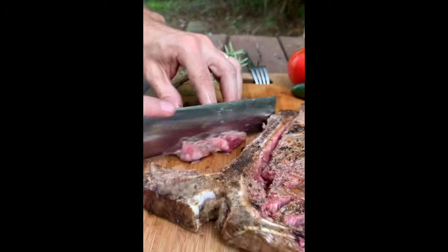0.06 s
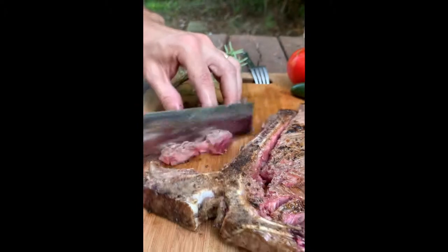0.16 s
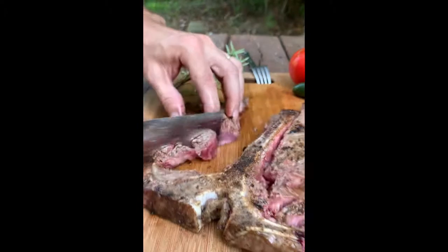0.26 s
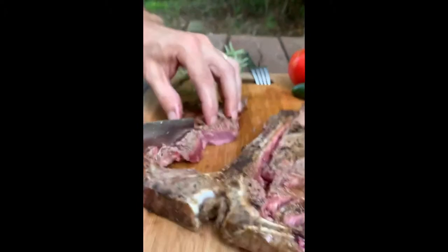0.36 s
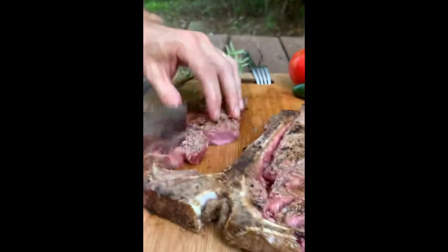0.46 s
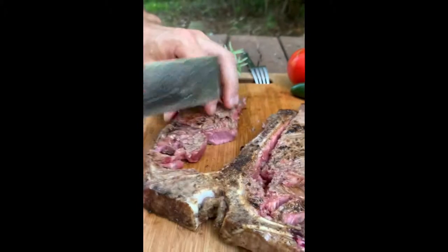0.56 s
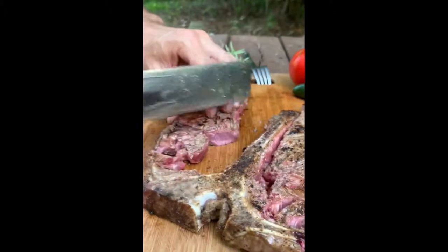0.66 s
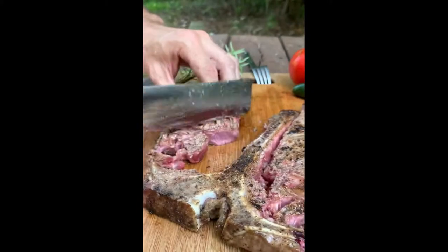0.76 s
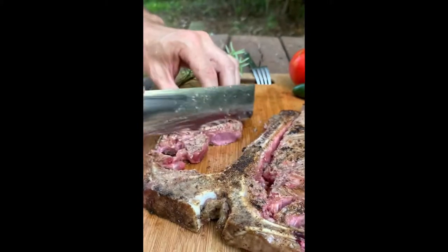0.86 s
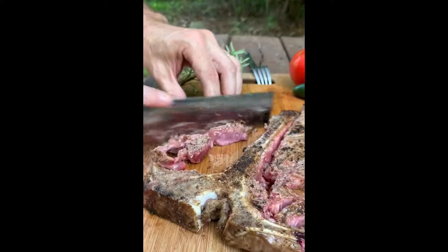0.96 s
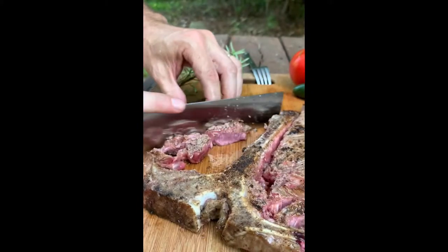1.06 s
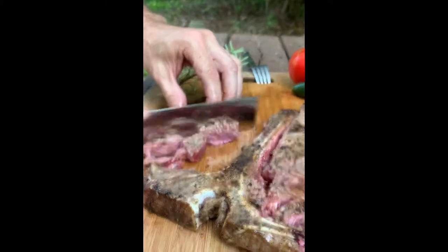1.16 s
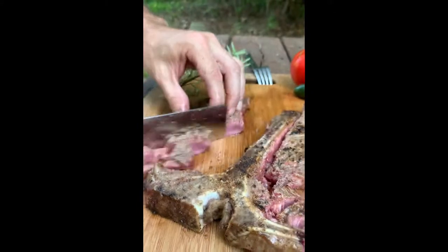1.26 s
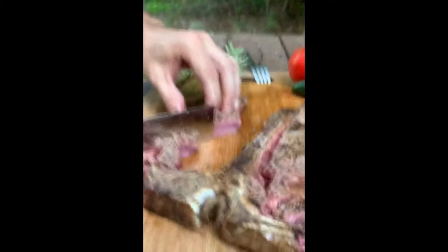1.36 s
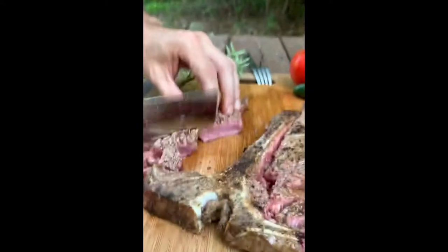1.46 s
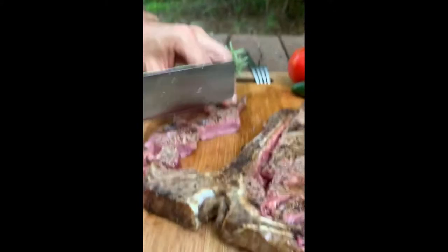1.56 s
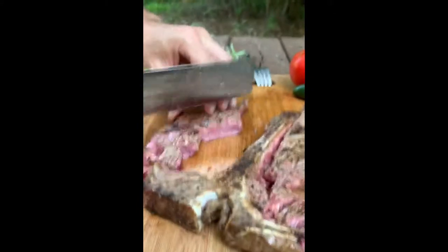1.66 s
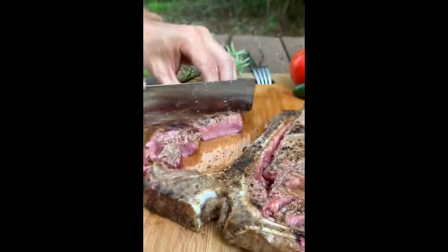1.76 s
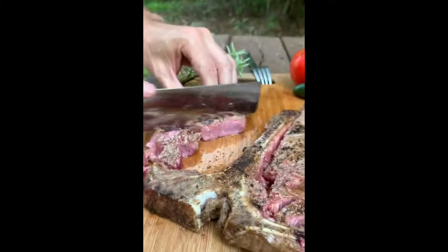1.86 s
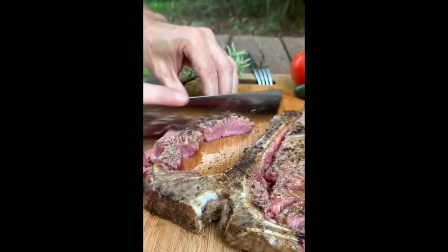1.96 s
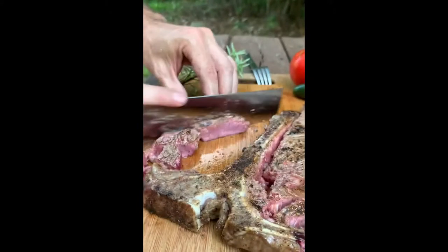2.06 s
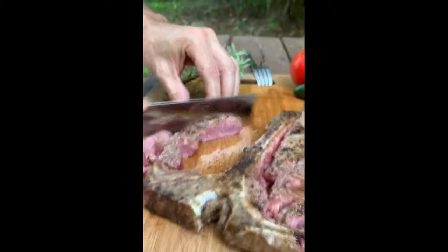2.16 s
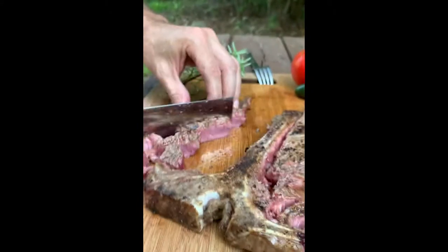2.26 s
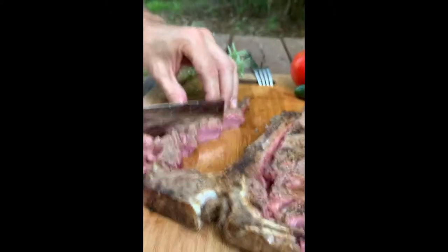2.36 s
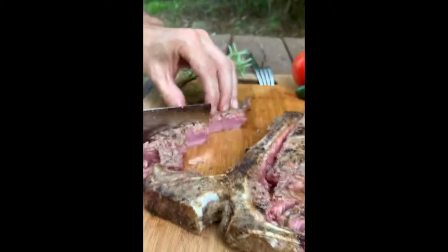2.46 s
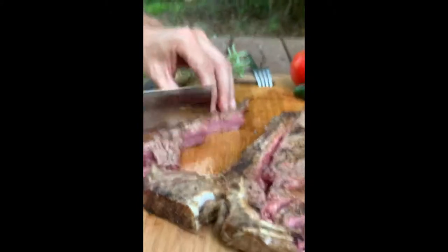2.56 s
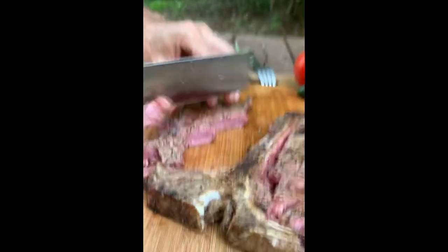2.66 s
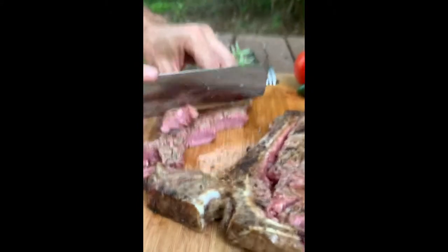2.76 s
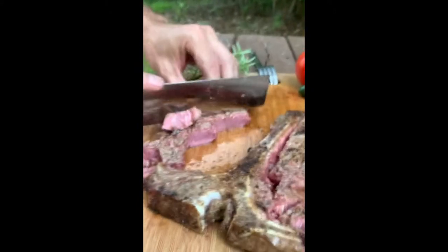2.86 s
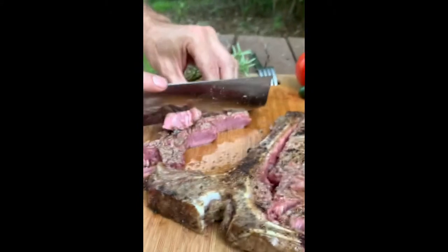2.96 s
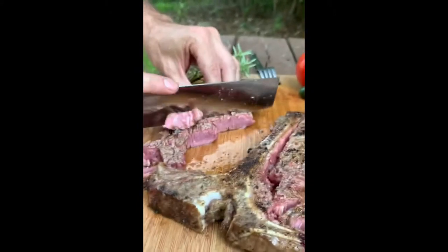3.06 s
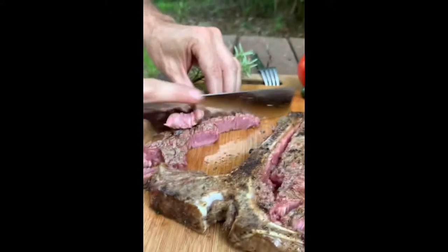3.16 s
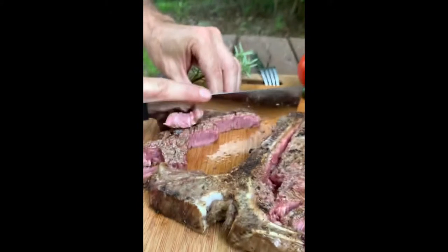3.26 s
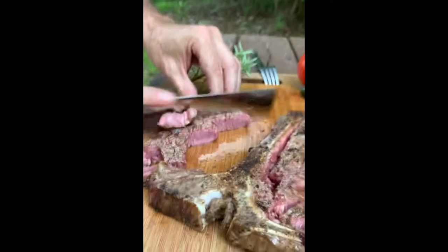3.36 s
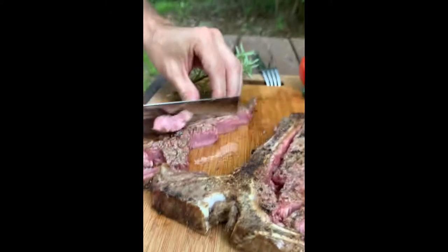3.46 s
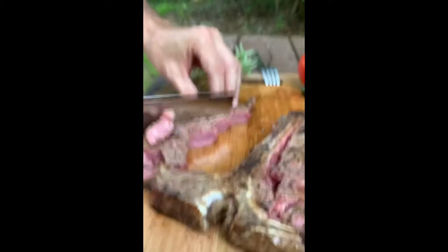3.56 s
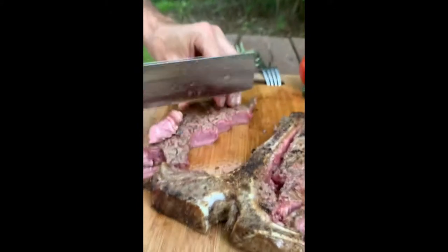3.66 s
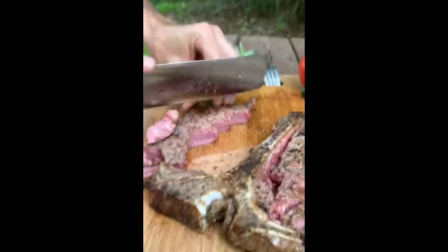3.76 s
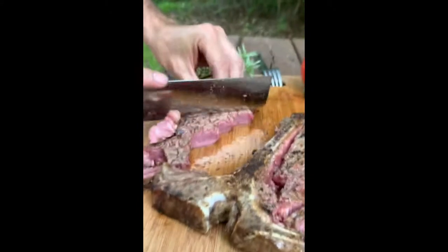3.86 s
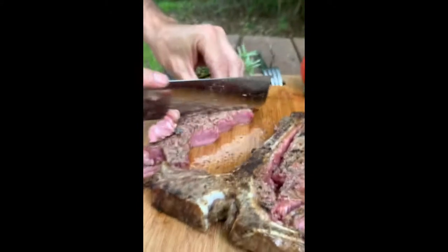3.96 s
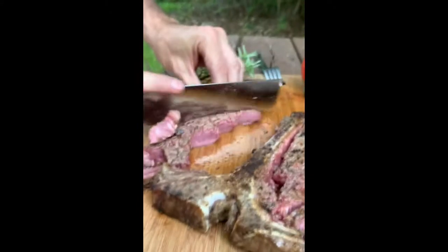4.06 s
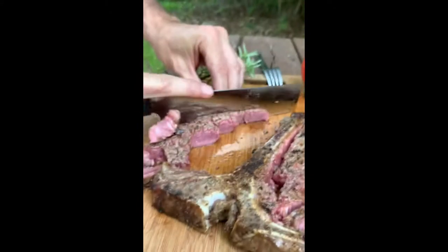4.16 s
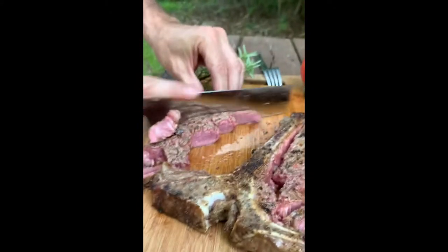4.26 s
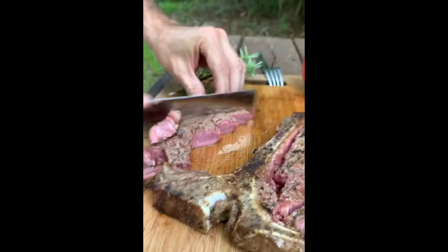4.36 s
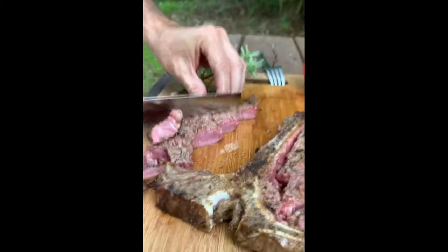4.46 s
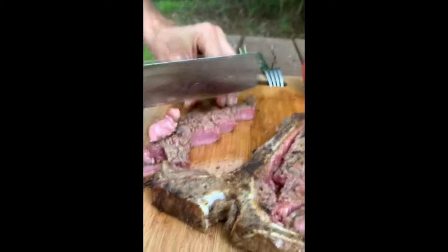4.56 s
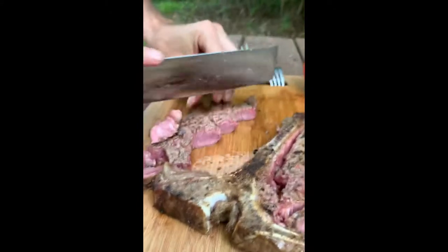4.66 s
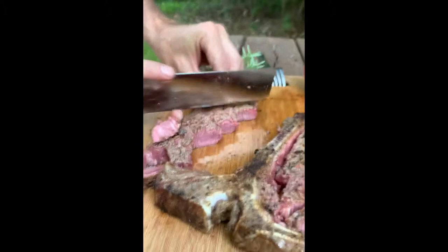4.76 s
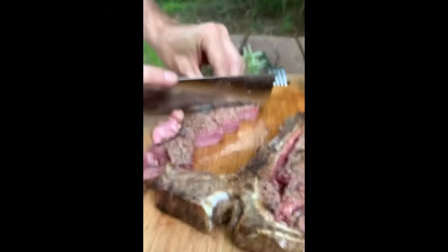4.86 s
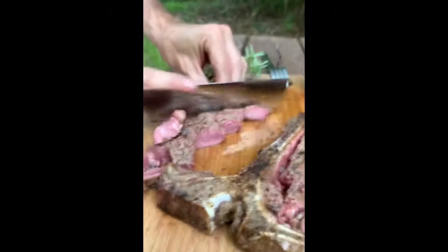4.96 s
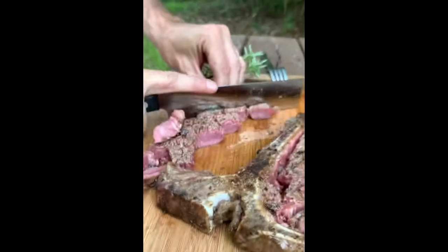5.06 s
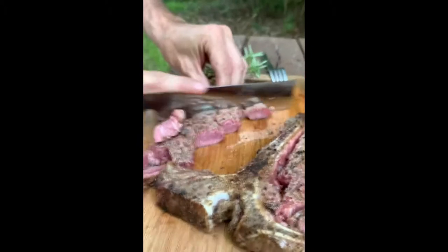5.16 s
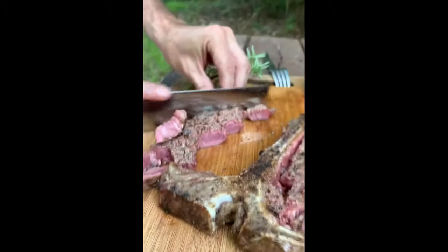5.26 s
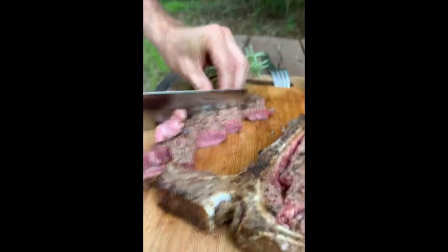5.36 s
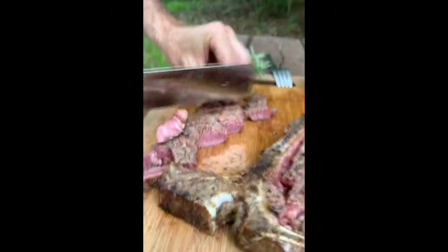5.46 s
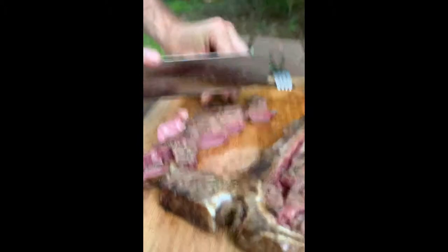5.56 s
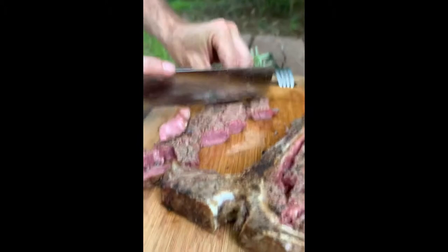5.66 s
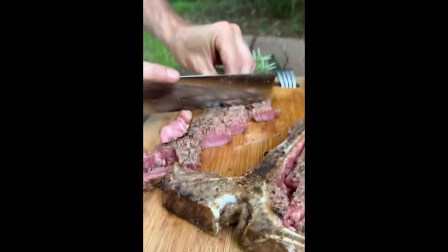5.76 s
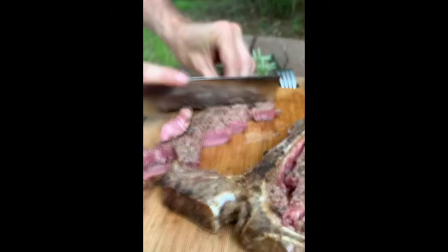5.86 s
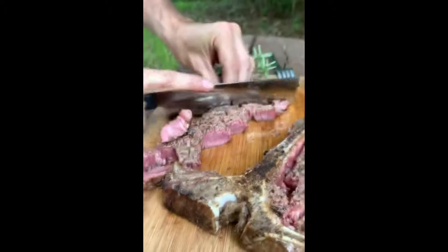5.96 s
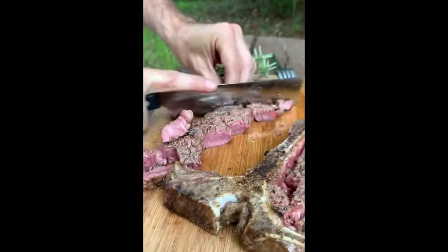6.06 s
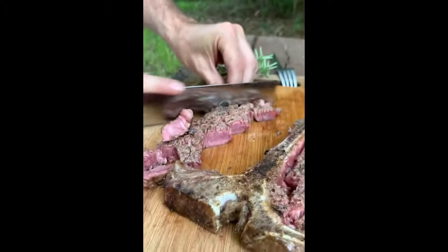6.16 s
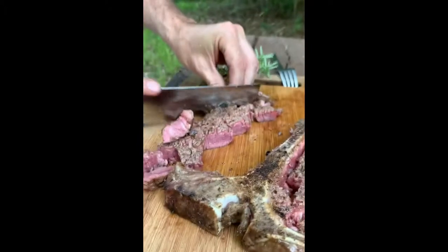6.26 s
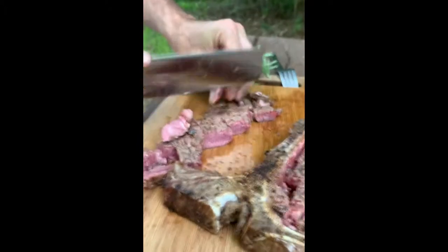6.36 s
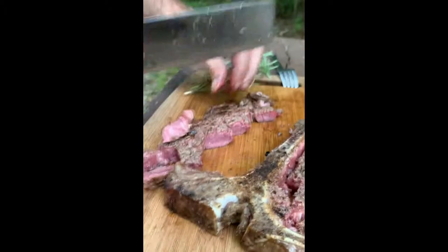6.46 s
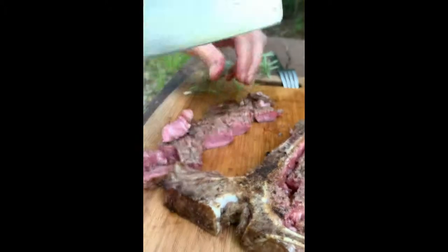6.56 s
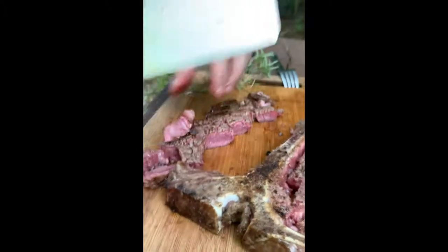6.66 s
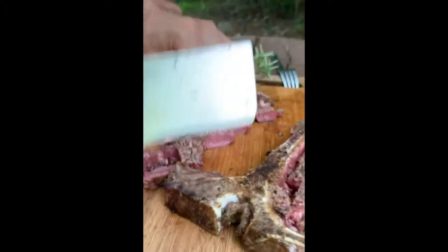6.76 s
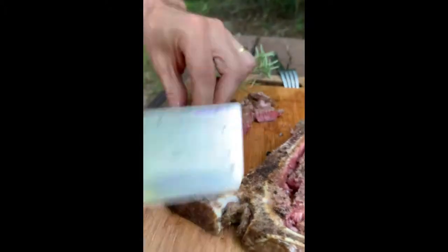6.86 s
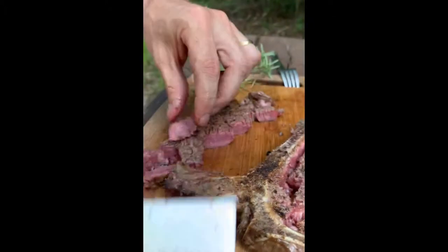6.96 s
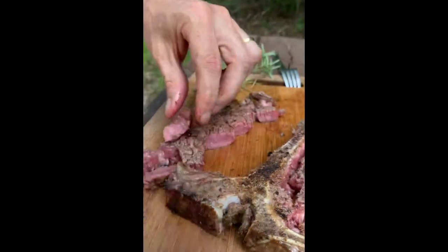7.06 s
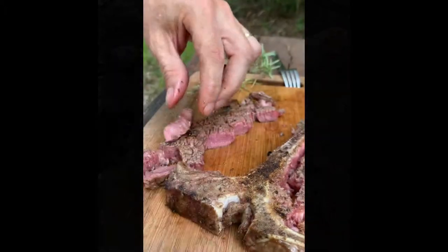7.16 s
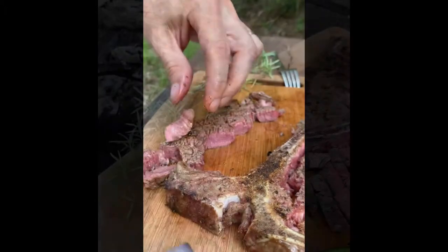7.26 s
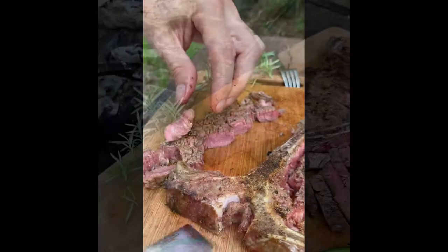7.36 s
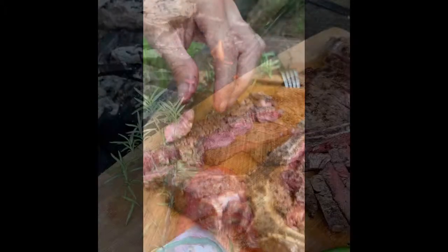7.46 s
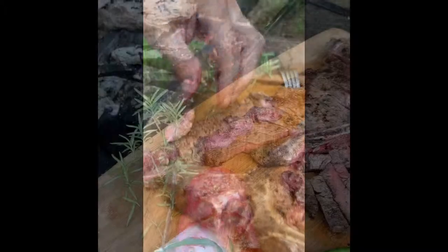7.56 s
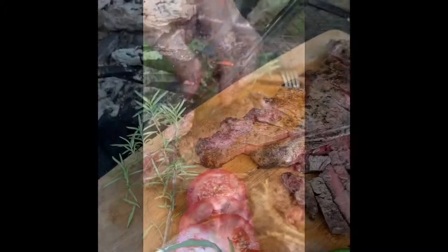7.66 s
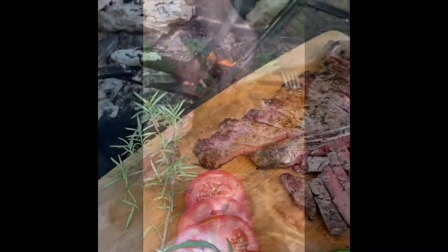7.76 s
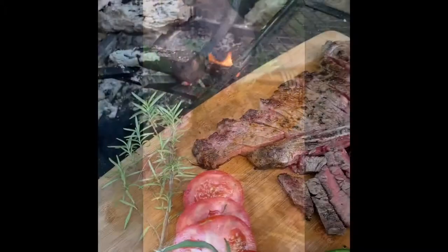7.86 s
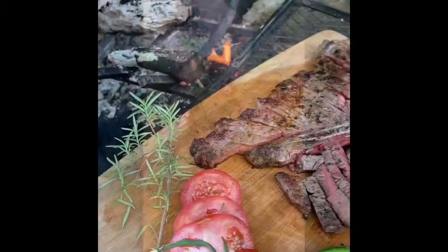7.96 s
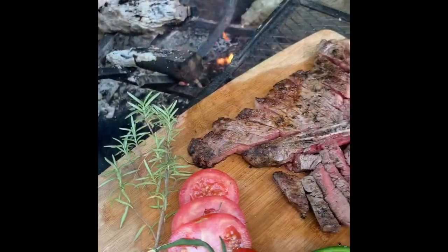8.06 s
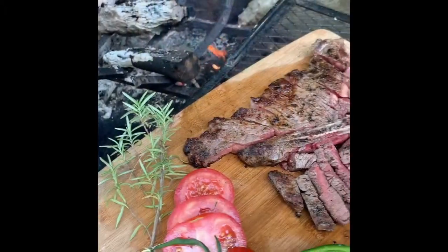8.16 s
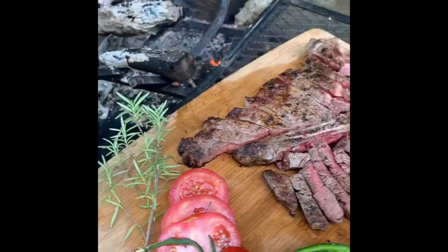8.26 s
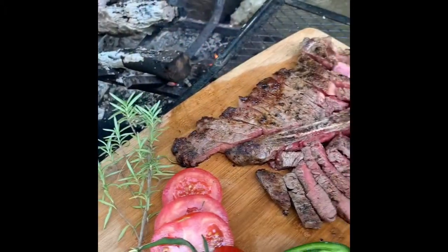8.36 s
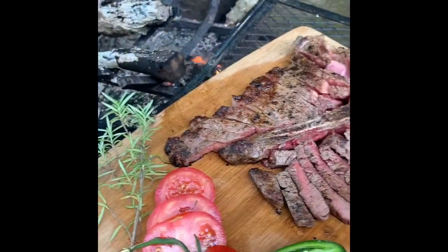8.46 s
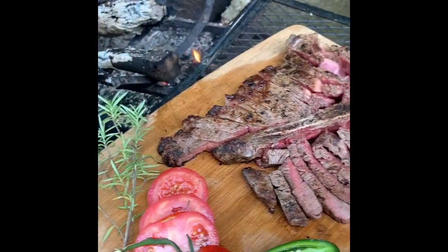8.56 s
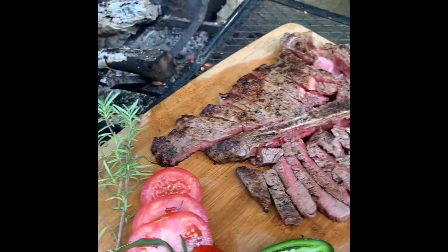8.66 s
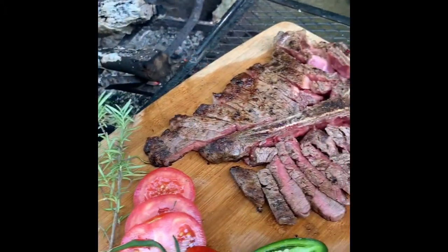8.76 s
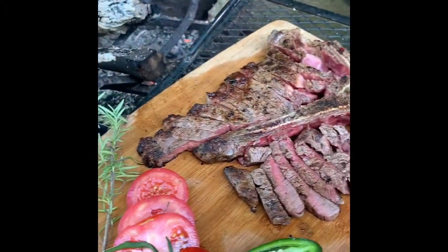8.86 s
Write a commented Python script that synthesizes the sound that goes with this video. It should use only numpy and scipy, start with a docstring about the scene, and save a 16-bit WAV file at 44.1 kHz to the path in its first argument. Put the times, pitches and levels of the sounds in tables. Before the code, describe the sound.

Close up outdoors, a knife slices cooked steak on a wooden board, seven knocks with gritty scrapes, then clinks down on the table as garden hiss fades.

```python
"""A knife knocks on a wooden board close to the microphone in a garden: cooked steak is being sliced.
Each cut is a shear of noise ending in a board knock; the edge is then drawn back in a scrape of resonant
friction that catches in the grain. Meat bumps and ticks, and a breeze of low noise rumbles on the microphone.
The blade is put down with ringing clinks and a table thud; the hiss of the garden fades, leaving faint air
and the gliding whistles of a far bird."""
import sys
import numpy as np
from scipy import signal
from scipy.fft import rfft, irfft
from scipy.io import wavfile
from scipy.ndimage import map_coordinates

SR = 44100
rng = np.random.default_rng(int(sys.argv[2]) if len(sys.argv) > 2 else 0)


def store_wav(level_fs):
    """Save 16-bit WAV to argv[1]."""
    pcm = np.round(np.clip(np.atleast_2d(level_fs), -1, 1) * 32767)
    wavfile.write(sys.argv[1], SR, pcm.T.astype(np.int16))


N = 392931
T, HZ = np.arange(N) / SR, np.fft.rfftfreq(N, 1 / SR)
AGE = np.arange(SR // 2) / SR  # seconds since a blow

# Resonances of the blade under friction. Each row: centre in Hz, width in Hz, weight in dB.
BLADE_BANDS = [(1745, 120, 2.5), (2024, 460, -1), (2300, 220, -0.5), (2900, 300, -18)]
# Resonances of the board under friction. Each row: centre in Hz, width in Hz, weight in dB.
BOARD_BANDS = [(910, 15, -2), (993, 63, 2.5), (1063, 54, 2.5)]
# Colour of shearing meat and of the edge snapping free. Each row: pitch in Hz, relative density in dB.
MEAT_SPECTRUM = [(100, -13.5), (350, 24), (700, -11), (1050, 11.5), (1450, 6.5), (2000, 12), (3000, 6),
                 (5000, 11.5), (9000, 4.5), (13000, 9), (16000, 1.5)]
# Colour of a dull bump on wood. Each row: pitch in Hz, relative density in dB.
BUMP_SPECTRUM = [(80, -8), (300, -4), (550, 0), (700, -6), (1000, -26), (1500, -40), (3000, -60)]
# Colour of steel ticking on wood. Each row: pitch in Hz, relative density in dB.
CLINK_SPECTRUM = [(60, -13), (200, 15), (700, 1.5), (2000, -1), (4500, 9), (6500, -10), (9000, -6.5),
                  (16000, -18)]
# Short modes of the handle. Each row: pitch in Hz, weight in dB, t60 in seconds.
HANDLE_MODES = [(620, -3, .025), (985, -2, .03), (1210, -7, .025), (1300, 4.5, .04), (1775, -4, .03),
                (2010, -7, .03), (2430, -6, .04), (2560, -7, .035), (3000, -8, .03), (3670, -14, .03),
                (4340, -13, .025)]
# Swell and fade of garden and insects. Each row: time in seconds, level change in dB.
GARDEN_FADE = [(0, 3.5), (3, 4.5), (7.2, 3), (7.6, 1.5), (7.9, -9), (8.2, -20), (8.9, -51)]
# Cuts down through the meat. Each row: second when the edge lands, knock level in dB, sharpness of
# the blow in dB, shear level in dB, how long before landing the shear is full in seconds,
# crunch of the last fibres in dB, boost of the knock's low notes in dB.
CUTS = [(0.015, -19.5, 3, -44.5, .02, -68, 7), (1.018, -11, 3, -41, 0.004, -57.5, 1.5),
        (2.002, -19, 4, -45, 0.031, -48.5, 1.5), (3.213, -7.5, 7, -44.5, 0.025, -47, -5.5),
        (4.17, -6.5, 7.5, -40.5, 0.016, -46.5, -6), (5.069, -31, -28, -47, 0.038, -41, 6),
        (5.996, -27.5, -24, -50.5, 0.053, -42.5, -2)]


def amp(db):
    """Decibels to gain."""
    return 10 ** (np.asarray(db) / 20)


def unit(x):
    """Scales to rms 1."""
    return x / np.sqrt(np.mean(x ** 2) + 1e-20)


def peaked(x):
    """Scales to peak 1."""
    return x / abs(x).max()


def read(points, hz):
    """Reads a table along log frequency."""
    f, value = np.transpose(points)
    return np.interp(np.log(hz + 1), np.log(f + 1), value)


def add(mix, s, sound):
    """Mixes a sound in at time s, in seconds."""
    part = mix[max(round(s * SR), 0):][:len(sound)]
    part += sound[:len(part)]


def colour(x, spectrum):
    """Gives x a spectrum, at rms 1."""
    gain = amp(read(spectrum, np.fft.rfftfreq(len(x), 1 / SR)))
    return unit(irfft(rfft(x) * gain, len(x)))


def resonate(x, bands):
    """Passes x through steep resonances, at rms 1."""
    hz = np.fft.rfftfreq(len(x), 1 / SR)
    gain = sum(amp(db) / (1 + (2 * (hz - f) / width) ** 2) for f, width, db in bands)
    return unit(irfft(rfft(x) * gain, len(x)))


def waver(count, rate_hz):
    """Slow chance, rms 1: noise with a soft upper limit near rate_hz."""
    low_pass = np.exp(-(np.fft.rfftfreq(count, 1 / SR) / rate_hz) ** 2)
    return unit(irfft(rfft(rng.standard_normal(count)) * low_pass, count))


def ring(modes, damping=1):
    """Dying modes, peak 1; each blow lands on another spot and weighs them a little differently."""
    total = 0
    for hz, db, t60 in modes:
        decay = amp(db + rng.normal(0, 0.81) - 60 * AGE / (t60 * damping))
        total = total + decay * rng.choice([-1, 1]) * np.sin(2 * np.pi * hz * AGE)
    return peaked(total)


def burst(spectrum, t60, rise=0.0001):
    """Crowded, quickly dying modes as a puff of noise; t60 and rise in seconds."""
    shape = peaked((1 - np.exp(-AGE / rise)) * amp(-60 * AGE / t60))
    return colour(rng.standard_normal(len(AGE)), spectrum) * shape / 2


def rock(pitch=1):
    """The low note of the whole board rocking on the table under a push."""
    rock_hz, t60_s = 139, .11
    onset = 1 - np.exp(-AGE * rock_hz * 2)
    return amp(-60 * AGE / t60_s) * np.sin(2 * np.pi * rock_hz * pitch * AGE) * onset


def crackle(count, per_s=260, spread_db=4.0):
    """Separate snaps of uneven size at random moments, rms 1."""
    size = amp(spread_db * np.minimum(rng.exponential(1, count), 3.5)) * rng.choice([-1, 1], count)
    return unit(size * (rng.random(count) < per_s / SR))


def friction(count, grains_per_s, grain_share, flutter_db):
    """Tiny slips of uneven size over a smooth rub, coming in clumps."""
    slips = (rng.random(count) < grains_per_s / SR) * rng.standard_normal(count)
    rub = grain_share * unit(slips) + rng.standard_normal(count)
    return rub * amp(flutter_db * waver(count, 130))


def stroke(progress, pointedness):
    """Effort of a stroke, 0-1: one arch from rest to rest."""
    return abs(np.sin(np.pi * progress)) ** pointedness


def glide(x, speed):
    """Shifts the pitch of x by a factor that changes over time."""
    return map_coordinates(x, [np.cumsum(speed)], order=3, mode="mirror")


def comb(x, stretch):
    """The contact slides away from the blade's end, so its reflections comb the sound with falling stripes."""
    # Reflections along the blade. Each row: delay in seconds before stretching, signed strength.
    paths = [(.0007, -.3), (.0032, .7), (.0051, -.45)]
    for delay, strength in paths:
        x = x + strength * map_coordinates(x, [np.arange(len(x)) - delay * stretch * SR], order=3)
    return unit(x)


def cuts():
    """The blade shears wet fibres on its way down; the last crunch on the wood and ring blade and board."""
    rise_db_per_s, hold_s, fall_db_per_s = 218.5, 0.011, 426.5
    crunch_delay_s, crunch_width_s, crunch_hiss_db = 0.0085, 0.01656, -5
    out, t = np.zeros(N), np.arange(-SR // 5, SR // 8) / SR  # t is 0 when the edge lands
    for s, _, _, shear_db, sink_s, crunch_db, _ in CUTS:
        rub = friction(len(t), 1200, 0.34, 2.4)
        # the shear swells as the blade sinks in, holds until just after it lands, and dies
        swell_db = rise_db_per_s * np.minimum(t + sink_s, 0) - fall_db_per_s * np.maximum(t - hold_s, 0)
        crunch = amp(crunch_db) * np.exp(-((t - crunch_delay_s) / crunch_width_s) ** 2)
        hiss = (amp(shear_db + swell_db) + amp(crunch_hiss_db) * crunch) * colour(rub, MEAT_SPECTRUM)
        cut = hiss + crunch * resonate(rub, BLADE_BANDS + BOARD_BANDS)
        add(out, s + t[0], cut[s + t >= 0])
    return out


def knocks(spread_s=0.00331, ring_db=-7, chatter_db=-12, rock_db=-22, full_below_hz=720):
    """A blow runs through the board as a bending wave, treble first; wood rings and rocks, the edge chatters."""
    # Colour of the blow. Each row: pitch in Hz, relative density in dB.
    blow_spectrum = [(50, -9.5), (200, -22), (320, 0), (600, 8), (710, 3.5), (790, -1.5), (890, 5.5),
                     (1020, 7.5), (1450, -15.5), (1900, 6.5), (2500, -2.5), (3000, -20), (4300, -15.5),
                     (5500, -39), (8000, -57.5), (16000, -46.5)]
    # Modes of the board. Each row: pitch in Hz, weight in dB, t60 in seconds.
    board_modes = [(298, 5.5, .09), (420, -6, .045), (530, 1, .06), (620, -4, .045), (715, -8, .04),
                   (910, -2, .05), (1020, -3, .05), (1150, -7, .045), (1620, -15, .05), (1885, -2, .05),
                   (2130, -8, .04), (2440, -7, .05)]
    out, hz = np.zeros(N), np.fft.rfftfreq(len(AGE), 1 / SR)
    lead_s = .01  # room ahead of the wave
    # spread_s is the travel time at 1 kHz
    phase = 4 * np.pi * spread_s * np.sqrt(1000 * hz) + 2 * np.pi * hz * lead_s
    wave = peaked(irfft(amp(read(blow_spectrum, hz)) * np.exp(-1j * phase), len(AGE)))
    low_pass = signal.butter(1, full_below_hz, fs=SR, output="sos")
    for s, db, sharp_db, *_, full_db in CUTS:
        knock = amp(sharp_db - 8.0) * wave
        wood = amp(ring_db) * ring(board_modes) + amp(rock_db) * rock()
        chatter = amp(chatter_db) * burst(blow_spectrum, 0.12)
        add(knock, lead_s + 0.002492, wood + chatter)
        low_boost = (amp(full_db) - 1) * signal.sosfilt(low_pass, knock)
        add(out, s - lead_s, amp(db) * (knock + low_boost))
    return out


def scrapes(travel=.9, wet_db=-8, judder_db=-3, judders_per_s=140):
    """The edge rubs and judders along the grain, driving blade and board; meat drags and crackles on steel."""
    # Edge drawn back over the wood. Each row: start in seconds, speeding up in seconds, slowing down in
    # seconds, pointedness of the swell, blade ring in dB, board ring in dB, hiss in dB, extra sheen at
    # the top of the treble in dB, drag of meat in dB, pitch factor of the blade ring, lag of the hiss
    # (above 1 it peaks later than the blade ring), singing of the edge in dB, boost of the board's
    # outer notes in dB.
    strokes = [(0.05, 0.22, 0.2, 1.1, -44, -47, -45, -1.5, -52.5, 1.04, 1.12, -58, 10),
               (1.055, 0.18, 0.17, 1.75, -39.5, -45.5, -39.5, 3.5, -54, 1.04, 1.13, -45.5, 3),
               (2.045, 0.11, 0.25, 1.43, -42, -47.5, -45.5, -1, -55, 1.03, 0.97, -53, 0),
               (2.32, 0.15, 0.14, 2.8, -47, -56.5, -48.5, -8, -61.5, 1.01, 0.91, -61, 2),
               (3.275, 0.15, 0.16, 2.57, -34, -39.5, -37, -4, -52.5, 1.013, 1.09, -36, -8),
               (4.22, 0.13, 0.17, 1.9, -36, -39.5, -38.5, 1, -53, 1.015, 1.16, -42, -4),
               (5.108, 0.14, 0.24, 2.86, -35, -35, -37, -7.5, -58, 1.046, 1, -36, -11),
               (6.058, 0.14, 0.15, 3.47, -41.5, -35.5, -39, 6.5, -58, 1.04, 0.96, -37, -16)]
    # Colour of the hiss. Each row: pitch in Hz, relative density in dB.
    hiss_spectrum = [(100, -57), (400, 3), (1400, -30), (3000, 6), (3500, 7), (4400, 9), (5700, 8.5),
                     (7500, 3), (9500, 5), (12000, 6), (14300, 2.5), (16000, -1)]
    # Resonances of dragged meat. Each row: centre in Hz, width in Hz, weight in dB.
    drag_bands = [(528, 100, 8), (634, 83, -6), (309.5, 80, 3)]
    # Notes on either side of the board's main ring. Each row: centre in Hz, width in Hz, weight in dB
    # before the stroke's own boost.
    outer_bands = [(1210, 180, -0.5), (766, 156, -13)]
    # how steeply each part follows the stroke, relative to the blade ring
    board_power, hiss_power, drag_power = 1.34, 0.79, 0.38
    # the blade's notes sink as the contact slides along the edge (share of their pitch per s)
    sink_per_s = .18
    # the edge also sings on one narrow resonance that sinks faster
    sing_hz, sing_width_hz, sing_sink_per_s = 1926, 180, .6
    out = np.zeros(N)
    for (s, rise_s, fall_s, pointedness, blade_db, board_db, hiss_db, sheen_db, drag_db, pitch, lag,
         sing_db, outer_db) in strokes:
        t = np.arange(0, rise_s + fall_s, 1 / SR)
        progress = np.interp(t, [0, rise_s, rise_s + fall_s], [0, .5, 1])
        effort = stroke(progress, pointedness)

        rub = friction(len(t), 900, 0.35, 1.2)
        stretch = np.exp(travel * t) * rng.uniform(.85, 1.15)
        grip = amp(1.4 * waver(len(t), 75))
        judder = amp(judder_db) * crackle(len(t), per_s=judders_per_s, spread_db=0.0)
        push = comb((unit(rub) + judder) * grip, stretch)

        # the contact wanders over the grain and feeds each resonance unevenly
        blade_patch, sing_patch, board_patch = (amp(1.2 * waver(len(t), 30)) for _ in range(3))
        blade_speed = pitch * np.exp(-sink_per_s * (t - rise_s))
        blade = amp(blade_db) * blade_patch * effort * glide(resonate(push, BLADE_BANDS), blade_speed)

        sing_speed = np.exp(-sing_sink_per_s * (t - rise_s))
        sing_note = glide(resonate(push, [(sing_hz, sing_width_hz, 0)]), sing_speed)
        sing = amp(sing_db) * sing_patch * effort * sing_note

        board_bands = BOARD_BANDS + [(hz, width, db + outer_db) for hz, width, db in outer_bands]
        board = amp(board_db) * board_patch * effort ** board_power * resonate(push, board_bands)

        drag_level = amp(drag_db + 2 * waver(len(t), 50))
        drag = drag_level * effort ** drag_power * resonate(push, drag_bands)

        bright = [(hz, db + sheen_db * np.clip(hz / 8000 - .8, 0, 1)) for hz, db in hiss_spectrum]
        wet_rub = comb(rub, stretch) + amp(wet_db) * crackle(len(t))
        hiss_effort = stroke(progress ** lag, pointedness * hiss_power)
        hiss = amp(hiss_db) * hiss_effort * colour(wet_rub, bright)
        add(out, s, blade + sing + board + drag + hiss)
    return out


def catches():
    """The edge sticks in the grain and snaps free: a tick and a very short ring."""
    # Snaps of the edge. Each row: start in seconds, level in dB, tick against the ring in dB.
    snaps = [(1.163, -29, -12), (3.362, -29, -10), (3.484, -41, -16), (5.024, -40, 3), (5.071, -34, -2),
             (5.074, -29.5, -5), (5.088, -50, -13), (5.134, -42, -12), (5.241, -29, -6), (5.268, -30, -19),
             (5.941, -41.5, 2), (5.998, -30.5, -1), (6.018, -24, -6), (6.034, -37, 0.5), (6.169, -25, -19),
             (6.193, -22, -20), (6.203, -29, -14), (6.216, -28, -14)]
    # Short ring of the edge. Each row: pitch in Hz, weight in dB, t60 in seconds.
    edge_modes = [(990, -1, .028), (1110, -4, .022), (1860, 1, .022), (2070, -2, .018), (2350, -4, .018),
                  (2850, -10, .012), (3900, -13, .008)]
    out = np.zeros(N)
    for s, db, tick_db in snaps:
        add(out, s, amp(db) * (ring(edge_modes, 1.0) + amp(tick_db) * burst(MEAT_SPECTRUM, 0.03)))
    return out


def handling(rock_db=3, soft_s=0.0014):
    """Hand and meat bump the board with soft onsets, meat ticks as it parts from steel, hollow pops ring."""
    # Soft bumps of hand and meat. Each row: start in seconds, dull knock in dB, rocking of the board
    # in dB before rock_db.
    bumps = [(1.363, -46, -35), (1.422, -48, -41), (1.465, -46.5, -44), (1.488, -52, -57),
             (1.542, -49, -33), (1.607, -55, -33.5), (1.711, -66, -41), (2.288, -48, -58),
             (2.356, -40, -42), (2.443, -47, -32), (2.505, -49, -56), (2.589, -43, -38.5),
             (2.706, -55, -39), (2.825, -40.5, -43), (2.894, -48, -55), (3.096, -70, -37),
             (3.315, -50, -41), (3.507, -59, -56), (3.559, -40.5, -38), (3.627, -44, -54), (3.73, -44, -38),
             (3.808, -41, -39), (3.861, -51, -56), (4.425, -45, -29), (4.558, -36.5, -27),
             (4.651, -44.5, -44), (4.664, -42, -42), (4.759, -42, -52), (4.848, -42, -32), (4.91, -57, -48),
             (5.41, -37, -32.5), (5.6, -49, -44), (5.72, -55, -45)]
    # Modes of the muffled board. Each row: pitch in Hz, weight in dB, t60 in seconds.
    muffled_modes = [(320, -3, .045), (430, -6, .035), (545, -1, .055), (610, 0, .055)]
    # Wet ticks of meat. Each row: start in seconds, relative level in dB, tilt in dB per octave.
    ticks = [(0.533, -43.5, 8), (0.999, -32, 12), (1.782, -38, 2), (1.935, -34, 3), (1.96, -25, 2),
             (2.136, -25, -1), (2.847, -42, 8), (2.901, -37, 0), (3.585, -36, 0), (3.8824, -34, -4),
             (3.986, -42, -7), (4.918, -47, 21), (5.074, -33, -6), (5.7302, -34.5, -9.5), (5.734, -32, 1),
             (5.9434, -29.5, -2), (5.996, -24, -13), (6.8436, -45, 0), (7.186, -36.5, -3),
             (7.5843, -41, 10), (8.0418, -55, 2.5)]
    # Colour of a tick before its tilt. Each row: pitch in Hz, relative density in dB.
    tick_spectrum = [(300, -41), (1500, -5), (4000, 8), (9000, 9), (13000, 10.5), (16000, 3.5)]
    # Small hollow pops. Each row: start in seconds, relative level in dB, pitch in Hz.
    pops = [(1.487, -50, 375), (2.155, -52, 290), (2.357, -46.5, 305), (4.617, -45, 1520), (4.65, -46, 335)]
    out, onset = np.zeros(N), 1 - np.exp(-AGE / soft_s)
    for s, db, push_db in bumps:
        knock = peaked(ring(muffled_modes, 1.0) * onset ** 2)
        knock = knock + amp(-22.5) * burst(BUMP_SPECTRUM, 0.09, rise=0.0073)
        add(out, s, amp(db) * knock + amp(push_db + rock_db) * rock(rng.uniform(.9, 1.123)))
    for s, db, tilt_db in ticks:
        snap = [(hz, level + tilt_db * np.log2(hz)) for hz, level in tick_spectrum]
        add(out, s, amp(db + 1.0) * (burst(snap, 0.01) + 0.14 * burst(snap, 0.14)))
    for s, db, hz in pops:
        tone = resonate(rng.standard_normal(len(AGE)), [(hz, 0.18 * hz, 0)])
        add(out, s, amp(db + 7.0) * tone * amp(-60 * AGE / 0.051) * onset)
    return out


def clinks():
    """Steel touching or leaving wood rings, ticks and slides; once the blade lies flat the wood stills it."""
    # Touches of the blade. Each row: start in seconds, level in dB, ring time as a factor, an unused
    # value, boost of the free tip's modes in dB, tick in dB.
    touches = [(0.455, -41, 0.45, 34, 2, -20), (7.3151, -21, 1.1, -3, -1, 0.5),
               (7.321, -28.5, 0.17, 0, 2, 0), (7.338, -27, 0.15, -3, 0, -3.5),
               (7.401, -42, 0.22, -6, 7, 4.5), (7.424, -42, .2, -3, 5, 5),
               (7.45, -30.5, 0.49, -0.5, -1.5, 0.5), (7.467, -25, 0.83, 4, -11, -2),
               (7.474, -26, 0.5, 0, -13.5, 0), (7.481, -26, 0.4, 17, -10.5, 2.5),
               (7.491, -25, 0.2, 15, -12.5, 4.5), (7.502, -28.5, 0.2, -5, -11.5, -0.5),
               (7.531, -30, 0.6, -5, -11, -2.5)]
    # Modes of the blade. Each row: pitch in Hz, weight in dB, t60 in seconds.
    steel_modes = [(576, -10, .17), (1560, -14, .3), (3525, -15, .2), (4268, -11, .2), (4290, -5, .38),
                   (5450, -13, .08), (6137, -9, .1), (7063, -11, .09), (8083, -5, .2), (8110, -10, .14),
                   (8620, -2, .08), (9300, -6, .1), (10430, -12, .16), (10465, -9.5, .22), (10530, -9, .1),
                   (11650, -12, .1), (12500, -19, .16), (14730, -18, .14), (15620, -21, .2)]
    # The close pair of modes of the free tip, in Hz.
    tip_hz = (4268, 4290)
    # Colour of the sliding blade. Each row: pitch in Hz, relative density in dB.
    slide_spectrum = [(60, 1.5), (170, 13), (800, 1), (1500, 6), (2400, 3), (3200, -8), (4500, -9.5),
                      (6000, -6.5), (9000, -25), (16000, -18)]
    flat_s, still_db_per_s = 7.46, 300
    out = np.zeros(N)
    for s, db, damping, _, tip_db, tick_db in touches:
        modes = [(hz, level + tip_db * (hz in tip_hz), t60) for hz, level, t60 in steel_modes]
        stilled = amp(-still_db_per_s * np.maximum(AGE - max(flat_s - s, 0), 0))
        slide = burst(slide_spectrum, .6 * damping) * amp(3 * waver(len(AGE), 111.1))
        tick = amp(tick_db) * burst(CLINK_SPECTRUM, .024, rise=.0005)
        clink = amp(-1.5) * ring(modes, damping) + tick + amp(-14.5) * slide
        add(out, s, amp(db) * stilled * clink)
    return out


def thuds(rumble_db=-17):
    """The handle drops on the table: table modes ring, the handle clacks and a dull rumble follows."""
    # Blows of the handle. Each row: start in seconds, relative level in dB, hardness of the blow in dB,
    # ring time of the table as a factor, pitch of the handle as a factor.
    drops = [(7.478, -22, -3.5, 0.53, 0.81), (7.483, -28.5, 6.5, 0.95, 0.93),
             (7.491, -25.5, -2.5, 0.58, 0.95), (7.5, -25, 5, 1, 0.91), (7.503, -19.5, 6.5, 1, 0.77),
             (7.5375, -18, 2.5, 0.68, 1), (7.5402, -7, -1, 1, 0.99), (7.5445, -13.5, 8, 1, 1),
             (7.548, -17.5, 5.5, 0.87, 1), (7.68, -22, -15, 1, 1)]
    # Modes of the table. Each row: pitch in Hz, weight in dB, t60 in seconds.
    table_modes = [(226, -9, .1), (285, -9, .08), (340, -7, .12), (377, -1.5, .16), (502, -4.5, .11),
                   (530, -5, .08), (596, 2, .1), (640, -5, .07), (865, -14, .08), (1023, -15, .18),
                   (1295, -2, .09), (1780, -18, .06), (2420, -14, .07)]
    # Colour of the clack. Each row: pitch in Hz, relative density in dB.
    clack_spectrum = [(40, -2.5), (200, 10.5), (450, 2.5), (1250, -11), (1700, -11.5), (2500, -21.5),
                      (4500, -12.5), (7000, -37.5), (16000, -34.5)]
    soft_hz = 430  # a soft blow stirs the table's modes less and less above this pitch
    out = np.zeros(N)
    for s, db, hard_db, damping, pitch in drops:
        softness_db = min(hard_db, 0)
        modes = [(hz, level + softness_db * np.log(max(hz / soft_hz, 1)), t60)
                 for hz, level, t60 in table_modes]
        handle = ring([(hz * pitch, level, t60) for hz, level, t60 in HANDLE_MODES])
        clack = handle + amp(-4) * burst(clack_spectrum, .03, rise=.0006)
        rumble = amp(rumble_db + softness_db / 2) * burst(BUMP_SPECTRUM, 0.14, rise=0.0043)
        add(out, s, amp(db) * (amp(-7.0) * ring(modes, damping) + amp(hard_db - 6.5) * clack + rumble))
    return out


def rattles(taps_per_s=900):
    """Blade and handle chatter as they settle: random taps, each ringing the handle with a tick."""
    # Chatters. Each row: start in seconds, length of the tapping in seconds, peak in dB.
    chatters = [(7.473, 0.052, -24.5), (7.544, 0.022, -22.5)]
    out = np.zeros(N)
    for s, length, db in chatters:
        count = int(length * SR)
        taps = crackle(count, per_s=taps_per_s, spread_db=7.0) * signal.windows.tukey(count, .5)
        tap_sound = ring(HANDLE_MODES) + burst(CLINK_SPECTRUM, 0.015)
        add(out, s, amp(db) * peaked(signal.fftconvolve(taps, tap_sound)))
    return out


def board_width(x, below_hz=1900, side_db=-10.0):
    """The wide board radiates low notes from many points: phase-scrambled, opposite in left and right."""
    low = signal.sosfilt(signal.butter(2, below_hz, fs=SR, output="sos"), x)
    paths = rfft(rng.standard_normal(len(AGE)) * amp(-60 * AGE / .012), N)
    # only the phases of the paths are used, 3 ms late
    side = irfft(rfft(low) * np.exp(1j * np.angle(paths) - 2j * np.pi * HZ * .003), N)
    return amp(side_db) * side * np.array([[1], [-1]])


def surroundings(x, t60=0.28):
    """Faint scatter from table and paving, different in each channel."""
    taps = rng.standard_normal((2, len(AGE))) * amp(-60 * AGE / t60) * (AGE > .002)
    return signal.fftconvolve(x[None], taps / np.linalg.norm(taps[0]), axes=1)[:, :N]


def air(spectrum, patchy_db, diffuse=1):
    """Noise in both channels, gently uneven; the more diffuse, the less alike they are."""
    # Left-right likeness of the open air. Each row: pitch in Hz, likeness from 0 to 1.
    likeness = [(20, 1), (150, 0.71), (400, 0), (1500, 0.2), (2800, 0.5), (4500, 1), (16000, 1)]
    a, b = (colour(rng.standard_normal(N), spectrum) for _ in range(2))
    same = np.clip(read(likeness, HZ), 0, 1) ** diffuse
    right = irfft(same * rfft(a) + np.sqrt(1 - same ** 2) * rfft(b), N)
    return np.array([a, right]) * amp(patchy_db * waver(N, 23))


def breeze():
    """Lumpy turbulence on the microphone, deep and fluttering, with a few single buffets."""
    # Buffets of air. Each row: start in seconds, peak in dB, pitch in Hz, tumbling eddies in dB.
    buffets = [(0.345, -37, 90, -36), (1.35, -18.5, 84, -27), (1.42, -27, 69.5, -27.5),
               (1.544, -43, 121, -54), (1.585, -32.5, 46.7, -54), (1.717, -24.5, 64, -35.5),
               (1.785, -32, 70.5, -39), (1.949, -29, 99, -44), (2.446, -47, 117, -34),
               (3.095, -26, 76, -41), (3.232, -24.5, 65, -31), (3.318, -35, 110, -28.5),
               (3.34, -29, 50, -44), (3.389, -33.5, 110, -33.5), (4.386, -25, 65.5, -46),
               (4.415, -23, 76, -31), (4.645, -26, 68, -31), (4.81, -26, 74.4, -29.5),
               (5.714, -36, 114, -43.5), (7.48, -23, 115.6, -28.5), (8.466, -42.5, 89.6, -41)]
    # Colour of the eddies behind a buffet. Each row: pitch in Hz, relative density in dB.
    eddy_spectrum = [(40, -9.5), (110, 4), (165, 2.5), (230, -9), (330, -16.5), (500, -35), (1000, -56),
                     (4000, -79)]
    # Course of the breeze. Each row: time in seconds, deep rumble in relative dB, flutter in relative dB.
    course = [(0.0, -38, -51), (0.24, -52, -62), (0.38, -37, -43.5), (0.76, -47, -67), (1.18, -49, -56),
              (1.36, -32.5, -47), (2.28, -40, -58.5), (2.38, -48, -45), (2.64, -34.5, -56.5),
              (3.22, -36.5, -56), (3.34, -30, -40.5), (3.52, -35.5, -59), (3.58, -37, -43.5),
              (4.0, -44.5, -61), (4.8, -31, -42.5), (5.18, -46.5, -62.5), (5.44, -42, -42.5),
              (5.54, -38, -50.5), (6.02, -40.5, -46), (6.12, -61, -61), (6.24, -38, -67),
              (6.36, -43, -48.5), (7.08, -34, -61.5), (7.32, -56.5, -64), (7.64, -44.5, -45.5),
              (7.92, -52, -65), (8.439, -46.5, -59.5), (8.9, -47, -66)]
    # Colour of the deep rumble. Each row: pitch in Hz, relative density in dB.
    rumble_spectrum = [(10, -21), (25, 3), (70, 4.5), (100, -11.5), (150, -24.5), (250, -44.5), (1000, -61),
                       (4000, -89.5)]
    # Colour of the flutter. Each row: pitch in Hz, relative density in dB.
    flutter_spectrum = [(40, -19.5), (90, -1), (130, 5.5), (170, -2.5), (230, -15), (500, -19.5),
                        (1000, -56), (4000, -58)]
    lumps = np.zeros(N)
    for s, db, hz, eddies_db in buffets:
        turns = hz * AGE
        push = peaked(turns * np.exp(-turns / .5) * np.sin(2 * np.pi * turns))
        eddies = amp(eddies_db) * burst(eddy_spectrum, 0.081, rise=0.0087)
        add(lumps, s, -amp(db) * push + eddies)
    s, rumble_db, flutter_db = np.transpose(course)
    rumble = amp(np.interp(T, s, rumble_db) - 3.5) * air(rumble_spectrum, 2.3)
    flutter = amp(np.interp(T, s, flutter_db) - 0.5) * air(flutter_spectrum, 4.5)
    return lumps + rumble + flutter


def garden():
    """The open hiss of the garden, noise that fades near the end, over a steady, more diffuse faint air."""
    # Colour of the garden. Each row: pitch in Hz, relative density in dB.
    garden_spectrum = [(20, 0), (200, 12), (500, 10.5), (1000, 5), (2400, 3), (3700, -2), (5000, 5),
                       (7000, 1), (7800, -5.5), (8700, -6), (10400, -3), (11200, -13.5), (14000, -9.5),
                       (16000, -25.5)]
    # Colour of the faint air. Each row: pitch in Hz, relative density in dB.
    quiet_spectrum = [(20, 23), (150, 11), (300, 14.5), (550, -0.5), (1100, -3.5), (2400, -4), (3000, 4),
                      (3900, 6.5), (4500, -6), (5500, -8), (9000, -9.5), (16000, -11.5)]
    hiss = amp(np.interp(T, *np.transpose(GARDEN_FADE)) - 60.0) * air(garden_spectrum, 0.68)
    return hiss + amp(-65.5) * air(quiet_spectrum, 1.0, diffuse=3.2)


def insects(db=-69.0):
    """A thin, far chirring of resonant noise that comes and goes and fades with the garden."""
    level_db = db + np.interp(T, *np.transpose(GARDEN_FADE)) + 3.5 * waver(N, 7)
    return amp(level_db) * resonate(rng.standard_normal(N), [(3980, 630, 2), (3324, 200, 0.0)])


def bird():
    """Gliding whistles of a far bird, smeared by the trees."""
    # Whistles. Each row: start in seconds, length in seconds, first pitch in Hz, last pitch in Hz,
    # relative level in dB.
    whistles = [(7.881, 0.17, 3300, 3940, -73), (8.21, 0.1, 3300, 3540, -77.5),
                (8.485, 0.11, 3420, 2680, -65), (8.49, 0.12, 3990, 3680, -71),
                (8.71, 0.085, 2740, 2700, -74.5)]
    song = np.zeros(N)
    for s, length, start_hz, end_hz, db in whistles:
        u = np.arange(0, 1, 1 / (length * SR))
        hz = end_hz + (start_hz - end_hz) * (1 - u) ** 1.2
        tone = np.sin(2 * np.pi * np.cumsum(hz) / SR)
        add(song, s, amp(db) * tone * signal.windows.tukey(len(u), .5))
    song *= amp(3.5 * waver(N, 60) - 1)
    return amp(-2) * song + amp(4.5) * surroundings(song, t60=0.6)


def scene():
    """Knife work up close amid the garden, turned in phase between left and right, with board width and scatter."""
    # Phase difference between left and right channels. Each row: pitch in Hz, phase in radians.
    phase_table = [(0, 0), (600, -.35), (1500, 0), (2400, 1), (3700, 1.5), (4900, 3.14), (15400, 18.85)]
    near = cuts() + knocks() + scrapes() + catches() + handling() + clinks() + thuds() + rattles()
    both = near + breeze() + garden() + insects() + bird()
    difference = np.interp(HZ, *np.transpose(phase_table))
    stereo = irfft(rfft(both) * np.exp(.5j * np.array([difference, -difference])), N)
    return stereo + board_width(near) + amp(-25.5) * surroundings(near, t60=0.029)


def record(dry):
    """The recorder's band limit: a steep low-pass."""
    low_pass = signal.firwin(511, 15850, window=("kaiser", 9), fs=SR)  # edge in Hz
    return signal.oaconvolve(dry, low_pass[None], "same")


dry = scene()
out = record(dry)
store_wav(out)
```